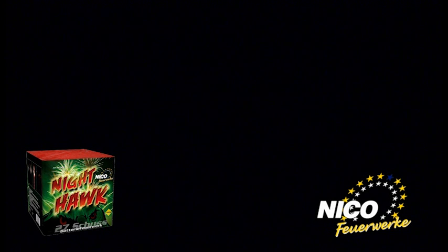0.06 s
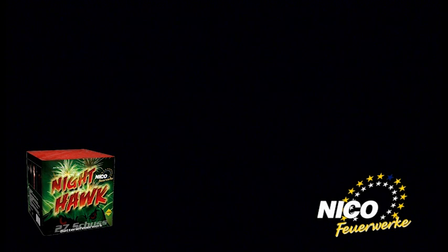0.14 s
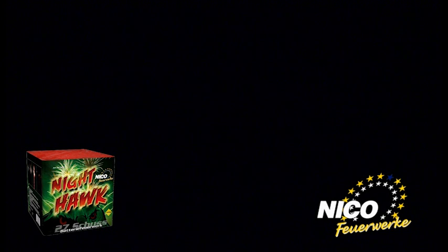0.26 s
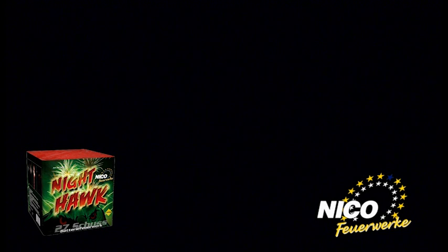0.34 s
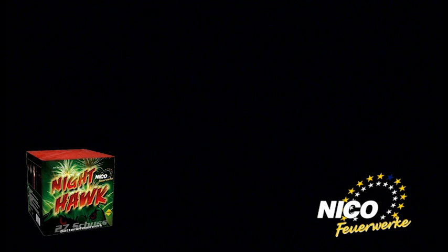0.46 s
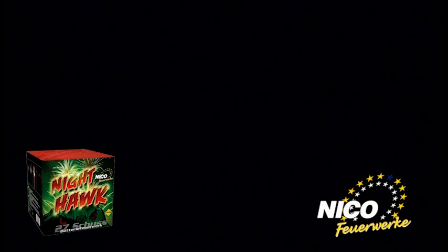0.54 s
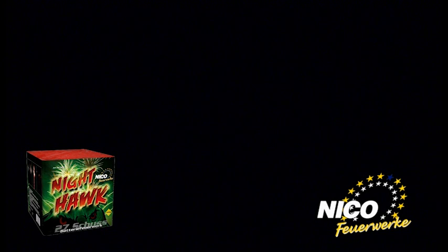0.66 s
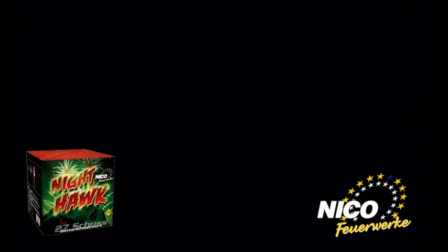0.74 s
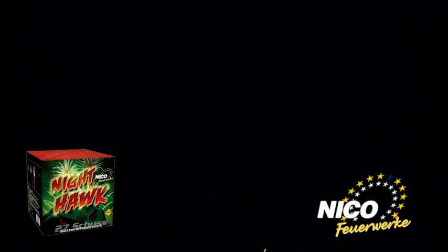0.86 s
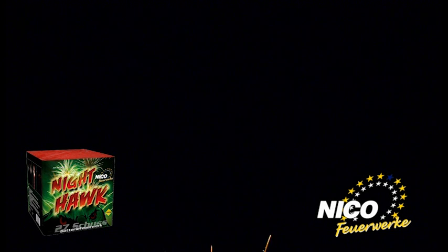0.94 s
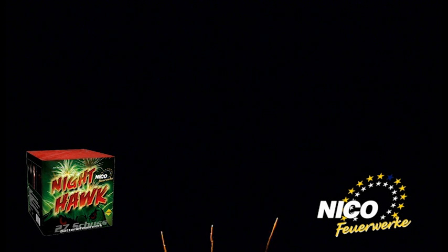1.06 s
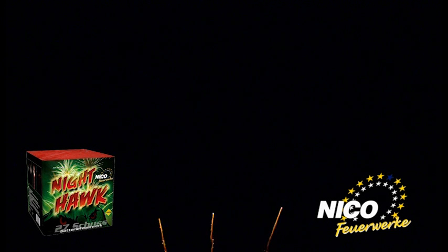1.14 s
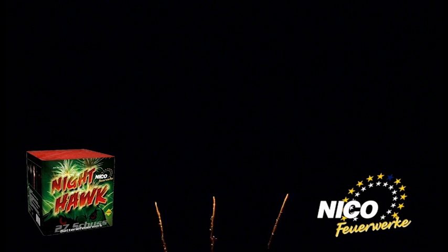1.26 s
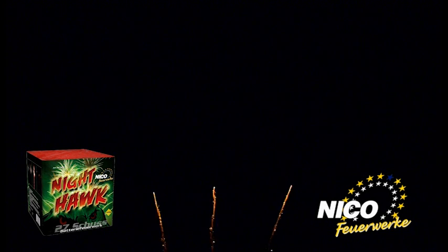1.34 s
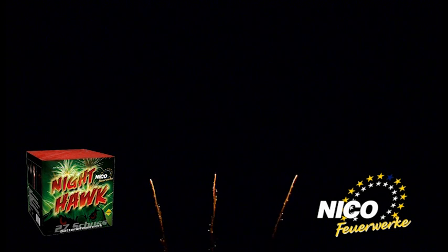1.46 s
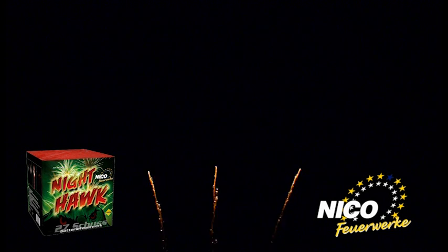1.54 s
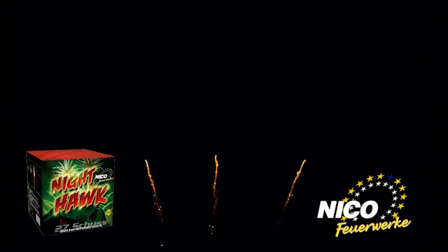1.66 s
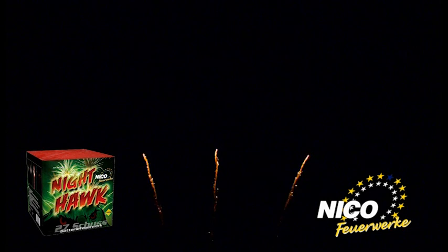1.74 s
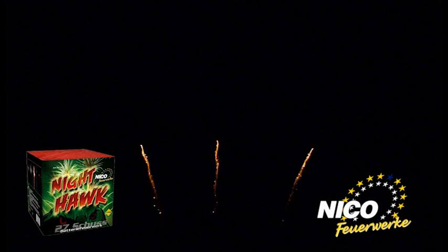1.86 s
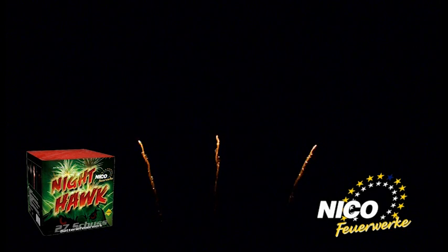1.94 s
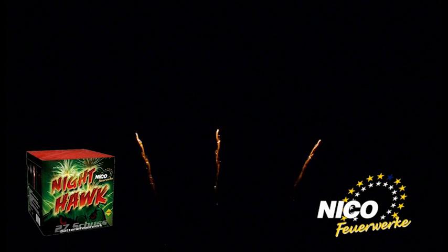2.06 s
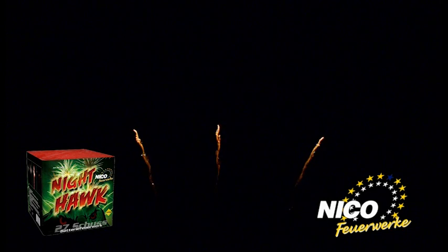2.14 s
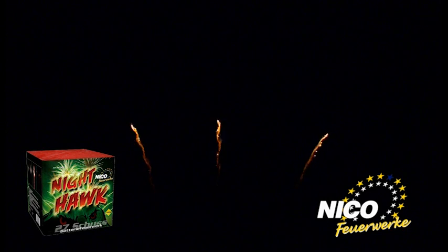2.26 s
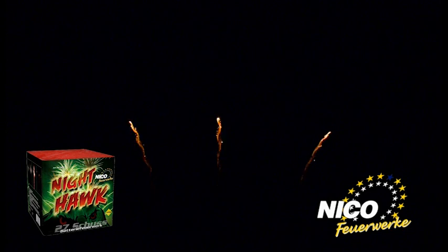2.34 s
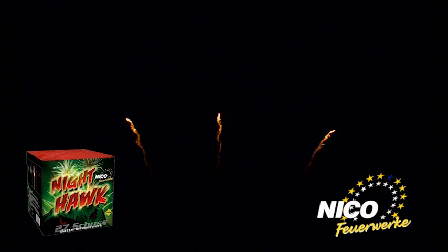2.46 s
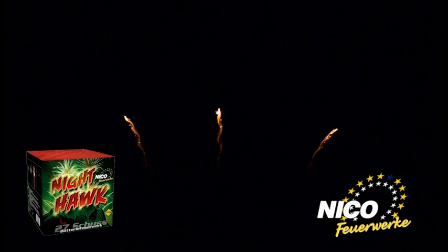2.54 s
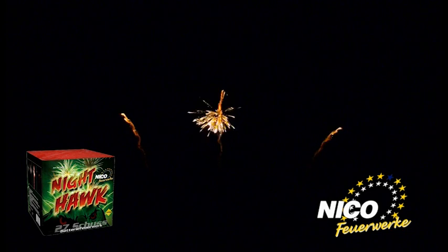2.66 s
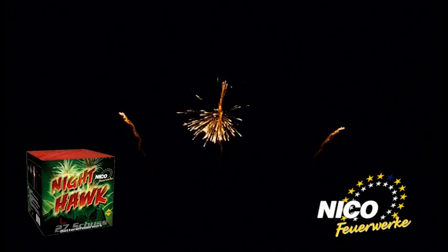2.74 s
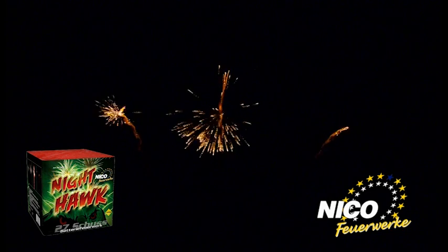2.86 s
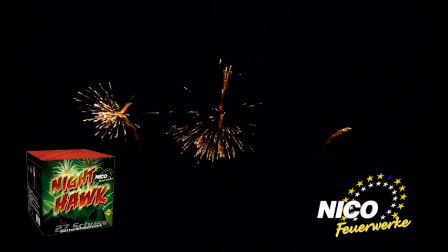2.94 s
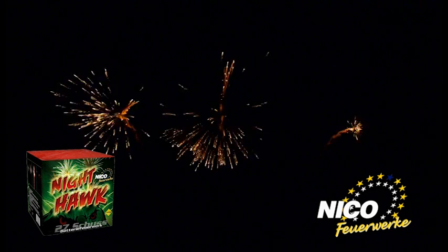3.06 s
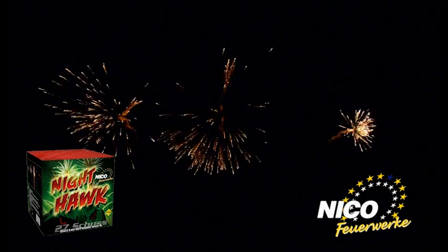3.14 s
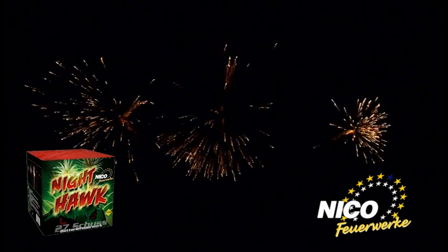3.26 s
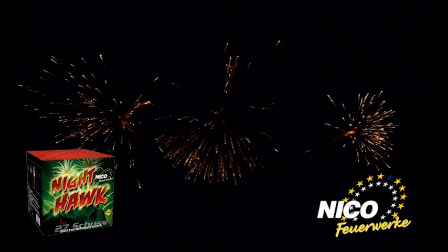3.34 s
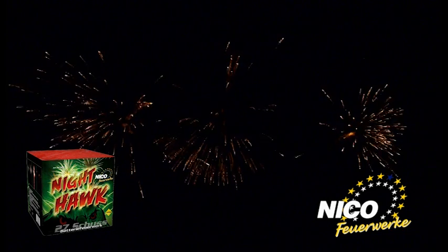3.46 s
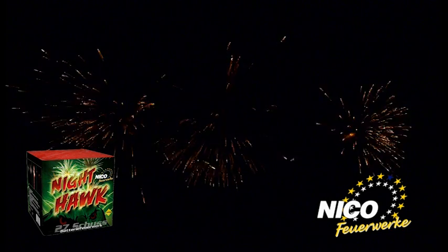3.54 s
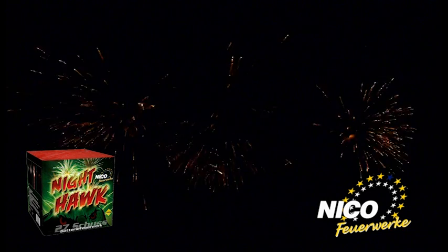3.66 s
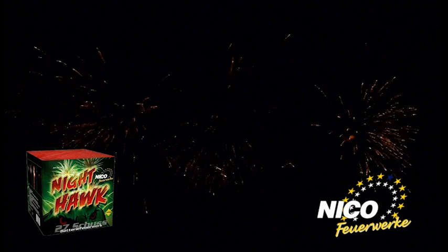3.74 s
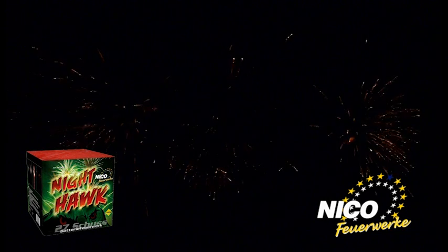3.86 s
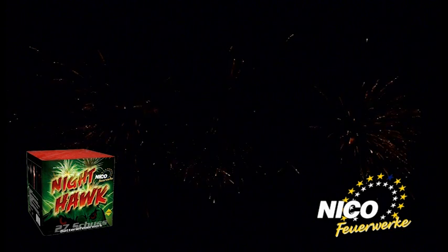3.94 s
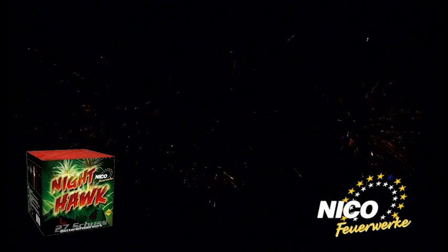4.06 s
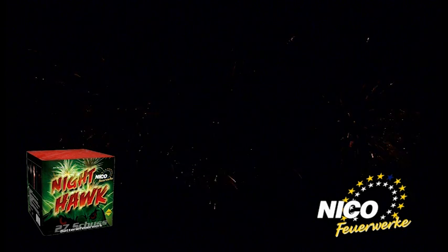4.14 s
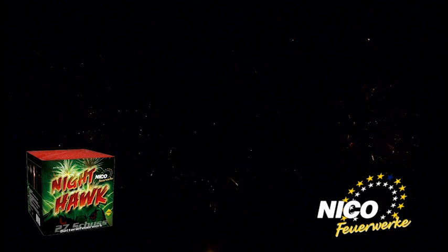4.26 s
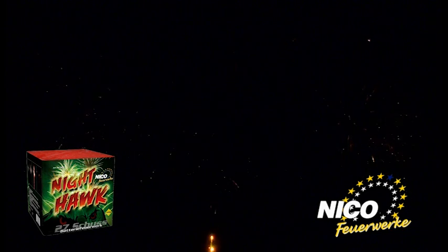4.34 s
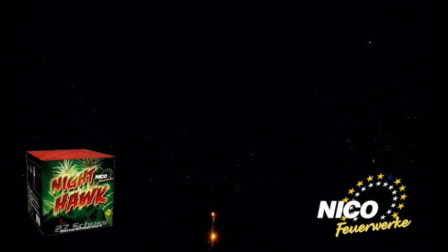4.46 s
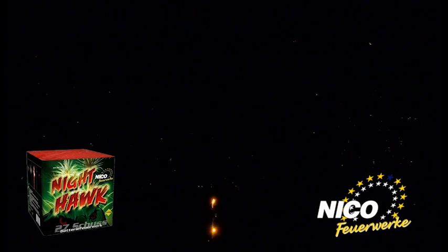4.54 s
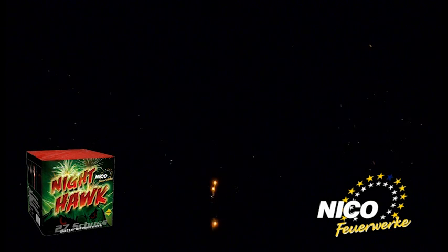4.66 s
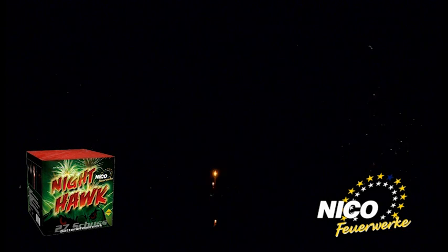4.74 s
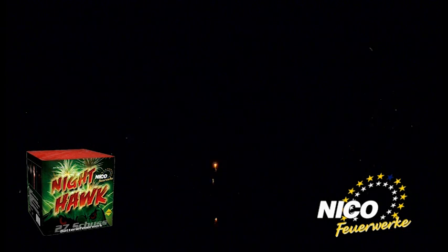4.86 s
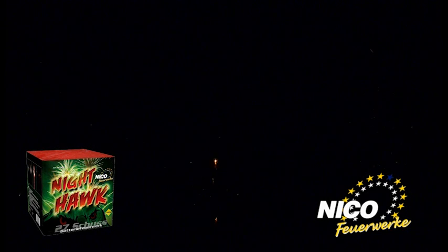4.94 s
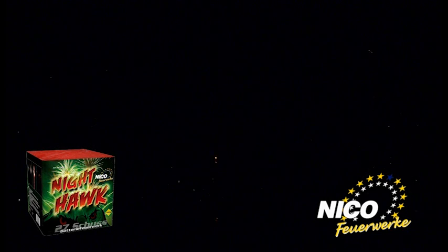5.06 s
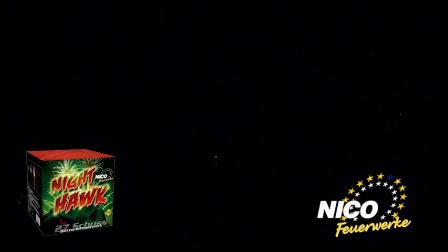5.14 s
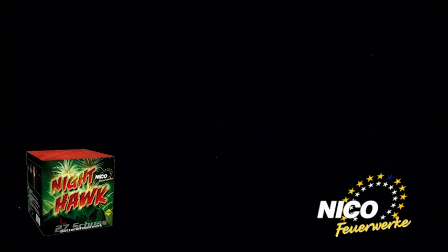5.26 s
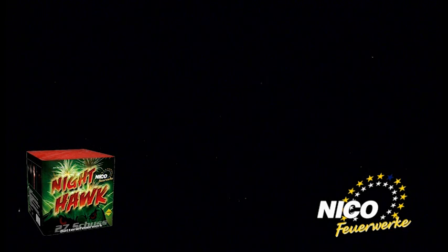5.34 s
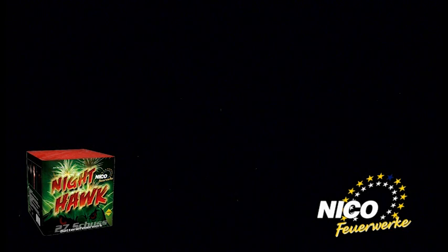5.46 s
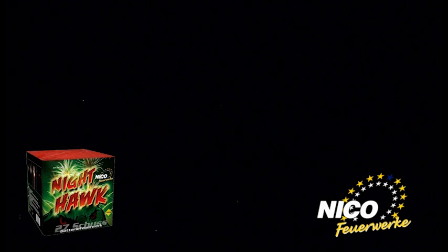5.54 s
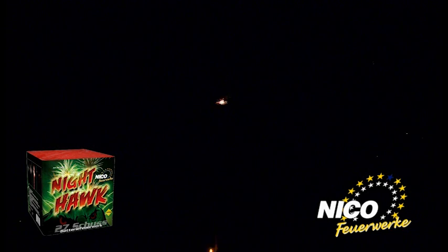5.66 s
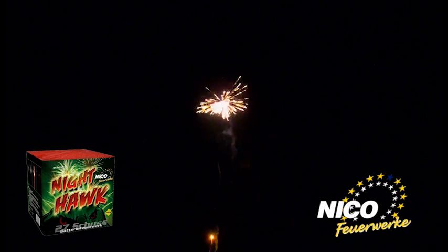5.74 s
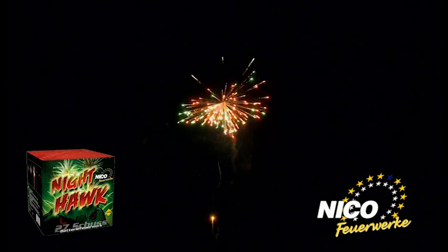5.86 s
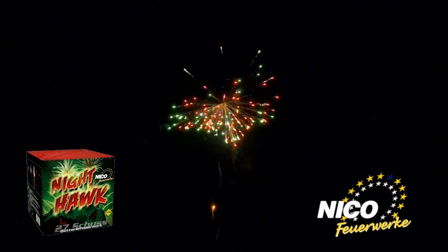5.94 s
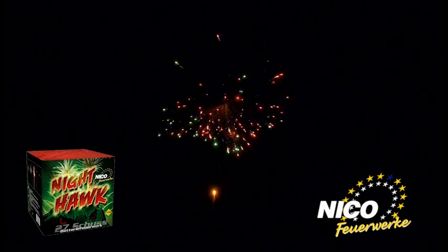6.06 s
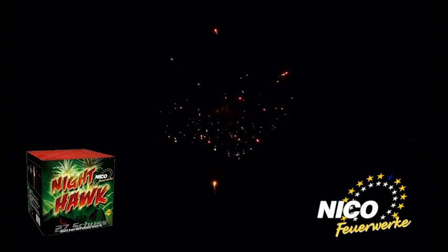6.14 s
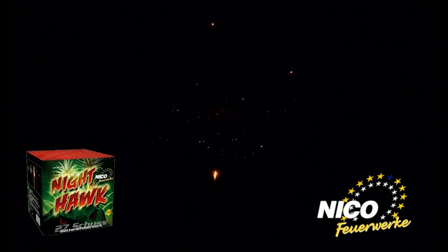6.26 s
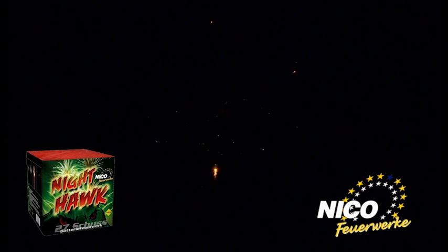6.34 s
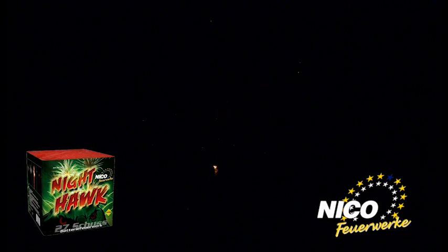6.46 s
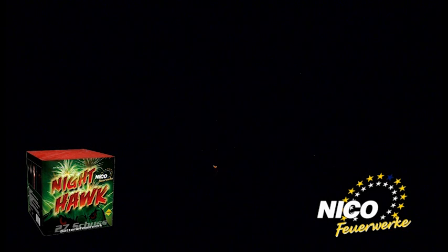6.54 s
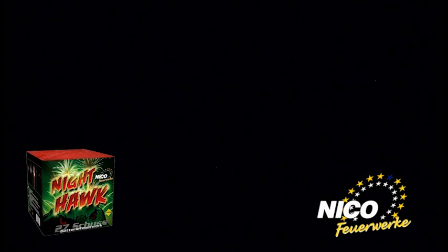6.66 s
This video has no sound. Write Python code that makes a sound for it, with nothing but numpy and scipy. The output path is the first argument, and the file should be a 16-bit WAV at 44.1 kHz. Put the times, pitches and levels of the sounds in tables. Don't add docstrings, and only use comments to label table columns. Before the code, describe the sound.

Outdoor night fireworks: a close double launch thump, faint rising hiss, three sharp bangs with long hissing echoes, a cracking launch, another thump, final bang.

```python
import sys
import numpy as np
from scipy import signal
from scipy.io import wavfile
from scipy.ndimage import uniform_filter1d

SR = 44100
rng = np.random.default_rng(int(sys.argv[2]) if len(sys.argv) > 2 else 0)


def transcribe(signal):
    frames = np.atleast_2d(signal).T
    limited = np.clip(frames, -1, 1)
    pcm = np.round(limited * 32767).astype(np.int16)
    wavfile.write(sys.argv[1], SR, pcm)


def undo_db(level):
    steps = np.asarray(level, float) / 20
    return 10 ** steps


N = 295470

# start_s, thump_db, crack_db, ground_bounce_ms, echo_db
LIFTS = [
    (0.2982, -4, -14.5, 0.6, 5.5),
    (0.3708, 1, -10.5, 0.29, 5),
    (3.8197, -1, -5.5, .4, 2.5),
    (5.088, -2.5, -14, 0.79, 0.5),
]
# start_s, thump_db, thump_hz, late_swing_db, echo_db
BURSTS = [
    (2.7355, -14, 257, -53, 5.5),
    (2.9977, -2, 265, -53, 3),
    (3.2447, -9, 302, -9, -1.5),
    (5.849, -9, 260, -47, 3),
]
# first_front_ms, then three later fronts, each in db
FRONTS = [(1., -11, -34, -12), (0.85, -8, -6.5, -43), (0.95, 4.5, 3, -6), (1., -11.5, -4, -36)]
# start_s, level_db, length_ms
PRIMERS = [(0.2946, -39.5, .6), (0.304, -15.5, 0.93), (.365, -41, 0.45), (0.376, -11, 0.84),
           (3.003, -15.5, 1.24), (3.2489, -13, 1.62), (3.816, -18.5, 1.08), (5.0858, -37, 0.71),
           (5.092, -18.5, 0.49)]
# delay_s, crack_db, thump_db
WALLS = [(.0052, -35, -16.5), (.013, -17.5, -31), (0.019, -28.5, -20.5), (.0513, -24, -38),
         (.0527, -6.5, -27), (.0542, -6, -20.5), (.057, -2.5, -23), (0.061, -17, -22), (0.08, -18, -31),
         (0.086, -23, -27.5), (.2, -35, -43), (0.216, -39, -49), (0.4359, -52, -27.5), (0.522, -23, -35.5)]
# delay_s, level_db, pitch_hz, width_hz, decay_t60_s
BARNS = [(.521, -42, 1210, 370, 0.061), (.2, -47, 1180, 2700, 0.094)]
# pitch_hz, width_hz, level_db
JETS = [(2500, 300, 2), (3900, 500, -0.5), (5300, 500, -8), (6700, 940, -2.5)]
# time_s, level_db
CLIMB = [(.5, -94), (.9, -78), (1.3, -71), (2, -76), (2.7, -83), (2.8, -100)]
# start_s, peak_db, pitch_hz
TICKS = [(.065, -46, 3500), (.065, -49, 5800), (.1335, -51, 3700), (1.876, -51, 3300), (1.876, -55, 2200),
         (2.178, -50, 2450), (2.178, -50, 3150), (2.178, -58, 4700), (2.332, -59, 5600), (2.481, -53, 3100),
         (2.481, -59, 4400)]
# delay_s, decay_t60_s, bass_db, treble_db, tilt_db_per_octave
LIFT_SCATTER = [(.004, 0.048, -19, -25.5, -2), (.015, .3, -44, -44.5, 2), (0.051, 0.12, -34.5, -24, -0.5),
                (.078, 0.4, -40, -42, 1), (0.179, 0.36, -36, -43.5, -0.5), (.27, 0.39, -42, -71, 3),
                (0.293, 1.2, -45.5, -53, 5), (0.422, 1.23, -43, -46.5, 2), (.56, 1.71, -51, -54, 2.6),
                (.8, 9, -66, -67, 4)]
# delay_s, decay_t60_s, bass_db, treble_db, tilt_db_per_octave
BURST_SCATTER = [(.004, 0.062, -26, -34.5, -2.6), (0.113, 1.04, -40.5, -47.5, -1.),
                 (.3, 0.59, -45, -105, -1.5), (0.402, 4.17, -51, -51, -1.9)]
# hedge_delay_s, hedge_t60_s, hedge_db, trees_delay_s, trees_db
AROUND = [(0.019, 0.45, 2.5, 0.21, 0.5), (0.015, 0.29, 2.5, 0.23, -0.5), (0.057, 0.096, 9.5, 0.14, 5.5),
          (0.023, 0.35, 0.8, 0.23, 2)]
# bass_db, treble_db, tilt_db_per_octave
HEDGE = (-32, -34.5, 0.5)
# decay_t60_s, bass_db, treble_db, tilt_db_per_octave
TREES = (2.5, -51.5, -45.5, 3.5)
# pitch_hz, level_db
BASS = [(30, -31), (60, -19.5), (120, -3.5), (200, -2), (300, -4), (400, -7), (500, -18), (900, -40)]
# pitch_hz, level_db
TUBE_ROLL = [(30, -37), (60, -26), (120, -8.5), (200, -0.5), (280, 0), (400, -8), (500, -19), (900, -48)]
# pitch_hz, level_db
TREBLE = [(250, -11.5), (500, 7.5), (1000, 1), (2000, -4.5), (4000, -7.5), (6000, -11), (7500, -9.5),
          (13500, -23)]
# pitch_hz, level_db
NIGHT = [(20, -36.5), (50, -6), (100, 3), (200, 1.5), (350, -8.5), (600, -22), (1500, -25), (4000, -41)]
# pitch_hz, level_db
MICROPHONE = [(25, -42.5), (58, 0), (100, 1.5), (4300, 1.5), (6000, 5.5), (9000, -7.5), (14000, -13),
              (15500, -35.5)]
# pitch_hz, level_db
SELF_NOISE = [(300, -12), (1000, 1.5), (3000, -1), (8000, -3.5), (13550, -1.5), (13750, -34), (16000, -55)]


def add(mix, start_s, sound):
    part = mix[round(start_s * SR):][:len(sound)]
    part += sound[:len(part)]


def coloured(x, points, size=4096):
    hz = abs(np.fft.fftfreq(size, 1 / SR))
    table_hz, table_db = np.transpose(points)
    level_db = np.interp(np.log(hz + 1), np.log(table_hz + 1), table_db)
    log_gain = level_db * np.log(10) / 20
    taps = np.fft.ifft(np.exp(np.conj(signal.hilbert(log_gain)))).real
    return signal.oaconvolve(x, taps[:size // 2])[:len(x)]


def noise(points):
    x = coloured(rng.standard_normal(N), points)
    return x / x.std()


def shock(ms, suction=0.35, rise=0.06):
    u = np.arange(200) / SR / (ms / 1000)
    return np.interp(u, [0, min(rise, 0.29), 0.3, 0.55, 0.8, 1.2], [0, 1, 0.75, -suction, -suction, 0])


def thump(hz, swell_ms=2.06, sag=17.0):
    t = np.arange(900) / SR
    u = t / (swell_ms / 1000)
    turns = hz * 1.003 * np.log1p(sag * t) / sag
    swell = (u * np.exp(1 - u)) ** 2.4
    return -np.sin(2 * np.pi * (turns - 0.06)) * swell


def crack(bounce_ms, bounces_db, front_ms, grit=0.22, rise=0.1):
    out = np.zeros(1200)
    for k, db in enumerate(bounces_db):
        add(out, k * bounce_ms / 1000, undo_db(db) * shock(front_ms, rise=rise))
    t = np.arange(len(out)) / SR
    return out + grit * rng.standard_normal(len(out)) * undo_db(-60 * t / 0.016)


def lifts():
    out = np.zeros(N)
    tube_hz = 272.4
    for start_s, thump_db, crack_db, bounce_ms, echo_db in LIFTS:
        low = undo_db(thump_db) * thump(tube_hz)
        add(out, start_s, low)
        add(out, start_s, undo_db(crack_db) * crack(bounce_ms, (0, -10, -14), 0.87, rise=0.2))
        for delay_s, wall_crack_db, wall_thump_db in WALLS:
            band = signal.butter(2, [500, min(900 / delay_s, 8500)], "band", fs=SR)
            front = signal.lfilter(*band, crack(bounce_ms, (0, -7), 0.46))
            add(out, start_s + delay_s, undo_db(wall_crack_db + echo_db - 11) * front)
            add(out, start_s + delay_s, undo_db(wall_thump_db) * low)
    return out


def primers():
    out = np.zeros(N)
    for start_s, db, ms in PRIMERS:
        add(out, start_s, undo_db(db) * shock(ms, suction=1.2, rise=0.22))
    return out


def bursts():
    out = np.zeros(N)
    stutter_ms, thin_ms = 0.72, 0.45
    for (start_s, thump_db, hz, swing_db, _), (first_ms, *later_db) in zip(BURSTS, FRONTS):
        crack_gain = undo_db(thump_db - 4)
        add(out, start_s, undo_db(thump_db) * thump(hz, swell_ms=1.65, sag=50.0))
        add(out, start_s + 0.0049, undo_db(swing_db) * thump(106, swell_ms=1.57, sag=5.0))
        add(out, start_s, crack_gain * shock(first_ms))
        stutter = crack(stutter_ms, later_db, thin_ms, grit=0.39)
        add(out, start_s + stutter_ms / 1000, crack_gain * stutter)
    return out


def sparks():
    white, t = rng.standard_normal(N), np.arange(N) / SR
    out = np.zeros(N)
    for hz, width_hz, db in JETS:
        out += undo_db(db) * signal.lfilter(*signal.iirpeak(hz, hz / width_hz, SR), white)
    climb_db = np.interp(t, *np.transpose(CLIMB), left=-120, right=-120)
    out *= undo_db(climb_db) / out.std()
    tick_t = t[:300]
    for start_s, db, hz in TICKS:
        add(out, start_s, undo_db(db - 60 * tick_t / 0.0063) * np.sin(2 * np.pi * hz * tick_t))
    return out


def barns():
    out, t = np.zeros(N), np.arange(4000) / SR
    smear = np.minimum(t / 0.004, 1)
    for start_s, *_, echo_db in LIFTS:
        for delay_s, db, hz, width_hz, t60_s in BARNS:
            band = signal.iirpeak(hz, hz / width_hz, SR)
            grit = signal.lfilter(*band, rng.standard_normal(len(t)))
            grit = signal.lfilter(*band, grit)
            level = undo_db(db + echo_db - 60 * t / t60_s)
            add(out, start_s + delay_s, level * smear * grit / grit.std())
    return out


def scattered_returns():
    returns = [(s, db, 0.064, True, row) for s, *_, db in LIFTS for row in LIFT_SCATTER]
    returns += [(s, db, 0.023, False, row) for s, *_, db in BURSTS for row in BURST_SCATTER]
    for (s, *_, db), (*hedge, hedge_db, trees_delay_s, trees_db) in zip(BURSTS, AROUND):
        returns.append((s, db + hedge_db, 0.095, False, (*hedge, *HEDGE)))
        returns.append((s, db + trees_db, 0.012, False, (trees_delay_s, *TREES)))
    return returns


def landscape():
    frames = dict(nperseg=256, noverlap=192)
    hz, t, bass = signal.stft(noise(BASS), SR, **frames)
    treble = signal.stft(noise(TREBLE), SR, **frames)[2]
    roll = signal.stft(noise(TUBE_ROLL), SR, **frames)[2]
    octave = np.log2(np.clip(hz, 300, 8000) / 1000)[:, None]
    air_db_per_s = 1.56 * (hz[:, None] / 1000) ** 1.8

    old = undo_db(-120 * t / 2.5)
    burst_low = undo_db(2 * -57) * old
    lift_low = np.zeros(len(t))
    high = undo_db(2 * -66 - 12 * octave) * old
    for start_s, db, share, from_lift, (delay_s, t60_s, bass_db, treble_db, tilt) in scattered_returns():
        rise_s = min(share * t60_s, 0.081 if tilt < 4.2 else 0.029)
        arrival_s = start_s + delay_s
        span = slice(np.searchsorted(t, arrival_s), np.searchsorted(t, arrival_s + t60_s))
        lag_s = 0.011 * (3 - octave) * (tilt > 2)
        age = np.maximum(t[span] - arrival_s - lag_s, 0)
        power = (1 - np.exp(-age / rise_s)) ** 2 * undo_db(2 * db - 120 * age / t60_s)
        low = lift_low if from_lift else burst_low
        low[span] += undo_db(2 * bass_db) * power[0]
        air_loss_db = air_db_per_s * (t[span] - start_s)
        high[:, span] += power * undo_db(2 * (treble_db + tilt * octave - air_loss_db))

    lumps = uniform_filter1d(rng.standard_normal((2, len(t))), size=7, axis=1)
    lumps /= lumps.std()
    z = (bass * np.sqrt(burst_low) + roll * np.sqrt(lift_low)) * undo_db(3.0 * lumps[0])
    z += treble * np.sqrt(high) * undo_db(1.56 * lumps[1])
    z[hz > 13600] = 0
    return signal.istft(z, SR, **frames)[1][:N]


def night():
    return undo_db(-61) * noise(NIGHT)


def scene():
    shots = lifts() + primers() + bursts()
    return (shots + sparks() + barns() + landscape() + night())[None]


def band_limit(x):
    return signal.sosfilt(signal.butter(12, 15990, fs=SR, output="sos"), x)


def record(dry):
    x = coloured(dry[0], MICROPHONE) + undo_db(-72.5) * noise(SELF_NOISE)
    x = x / (1 + abs(x / 0.9) ** 6) ** (1 / 6)
    return band_limit(x[None])


dry = scene()
out = record(dry)
transcribe(out)
```